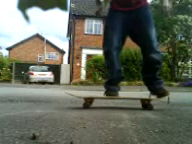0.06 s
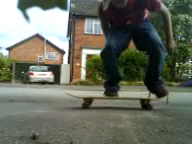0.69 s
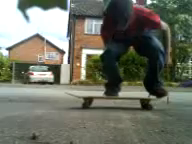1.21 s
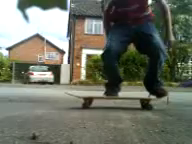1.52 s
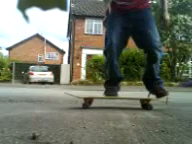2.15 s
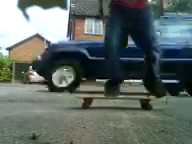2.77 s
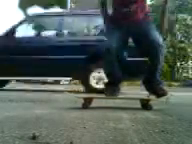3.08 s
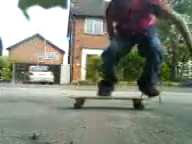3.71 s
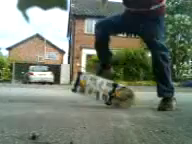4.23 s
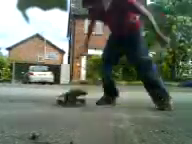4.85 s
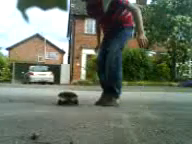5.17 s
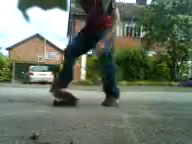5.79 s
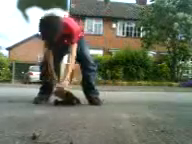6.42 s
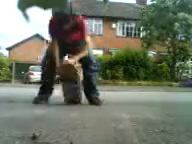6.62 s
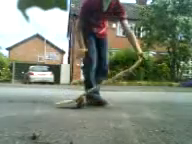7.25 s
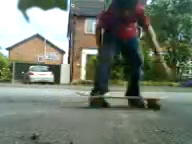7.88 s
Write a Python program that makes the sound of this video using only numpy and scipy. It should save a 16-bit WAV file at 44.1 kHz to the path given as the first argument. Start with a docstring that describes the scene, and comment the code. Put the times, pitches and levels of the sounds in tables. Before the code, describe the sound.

A wooden skateboard cracks, skids and bounces on the pavement among scuffing shoes, after a diesel car rumbles slowly by.

```python
"""Missed flip trick on a residential street

Close by, a wooden skateboard pops, slams on the asphalt, skids and clatters among scuffing shoes; it is
kicked over, picked up with its wheels spinning and dropped on them. House fronts return a thin echo.
Behind it a diesel car crawls past, about five metres off at its nearest. Heard from a small camera on
the ground, through a narrow-band microphone that overloads on the hardest slam."""
import sys
import numpy as np
from scipy import signal
from scipy.fft import rfft, irfft, next_fast_len
from scipy.io import wavfile
from scipy.ndimage import uniform_filter1d

SR = 44100
rng = np.random.default_rng(int(sys.argv[2]) if len(sys.argv) > 2 else 0)


def waveform_to_disk(signal):
    """Save audio, clipped to [-1, 1], as 16-bit WAV at the path in sys.argv[1]."""
    frames = np.transpose(np.atleast_2d(signal))
    scaled = np.clip(frames, -1, 1) * 32767
    samples = np.round(scaled).astype(np.int16)
    wavfile.write(sys.argv[1], SR, samples)


N = 354123
TIME = np.arange(N) / SR

# blows on the board: t/s, level/dB, brightness/dB, flat slap/dB, hollow knock/dB, contact/s
BLOWS = [(4.034, -16.5, -1, 1, -13.5, .0013), (4.3473, -19, -3.5, 3.5, 3.5, .0075),
         (4.3773, -14, 1, 2.5, 0, .004), (4.38, -8, 9.5, 2, -9.5, .0063),
         (4.4929, -31, 3.5, -2, -.5, .0015), (4.566, -21.5, 4, -2, -1.5, .0038),
         (4.595, -30.5, 0.5, -3, -2.5, .002), (4.6589, -31, 2, -4, 2.5, .004),
         (4.679, -32.5, 0, 0, -1.5, .002), (4.7449, -35.5, -1, -3.5, -0.5, .002),
         (4.786, -22.5, 1.5, -.5, -6, .005), (4.823, -25, -2.5, 7.5, 3.5, .009),
         (4.981, -36, -0.5, 4, 8, .008), (5.0024, -25, 3, -8, 3.5, .006),
         (5.0184, -14, -1.5, -1, -2, 0.0035), (5.102, -36.5, 0.5, 1, 5, .006),
         (5.135, -37.5, -1.5, 1, -1, .005), (5.722, -31, -5.5, 0.5, 0, 0.005),
         (5.8324, -20, 6, -3, -3.5, .0024), (5.8385, -14.5, -3, -0.5, -1.5, 0.0069),
         (5.906, -31.5, -3.5, 1, 8, 0.0045), (5.979, -20, -4, -1, -1, 0.0045),
         (6.055, -31.5, -3, -1, 5.5, .009), (6.6592, -20, 5, .5, -7, 0.0025),
         (6.761, -31, 0, -2.5, 0, 0.006), (7.328, -19.5, -2, 4.5, 0, 0.0084),
         (7.4064, -42.5, 4, 5, 6, .003), (7.431, -39.5, 2, 4, -5, .005),
         (7.9152, -23.5, 2.5, 3, -2.5, .0045)]
# modes of deck and trucks: f/Hz, level/dB, t60/s before a blow or skid shortens it
BOARD_MODES = [(135, -15.5, 0.025), (290, -9.5, 0.074), (502, -6, 0.076), (567, 0, 0.071),
               (696.5, -3.5, 0.049), (798, 0, 0.062), (938, -2.5, 0.053), (1062.6, -0.5, 0.031),
               (1259, -1, 0.032), (1455, 0.5, 0.065), (1600, -9, 0.051), (1726, -5.5, 0.071),
               (1815, -3.5, 0.069), (2009, -8, 0.042), (2270, -5.5, 0.1), (2635, -6, 0.034),
               (2695, 1, 0.049), (2983, -3, 0.088), (3166, -5.5, 0.053)]
# registers of a blow (thump, body, knock, clack, crack): low f/Hz, high f/Hz, grit re wood/dB
REGISTERS = [(69.5, 360, 6), (480, 780, -2.5), (750, 1250, 0.5), (1330, 2150, -2.5), (2036.5, 3500, 0.5)]
# board sliding on asphalt: t/s, length/s, level/dB, change over the slide/dB, edge scrape re skid/dB
SKIDS = [(4.047, 0.11, -31, -17.5, -14), (4.354, .03, -24.5, -1, -7.5), (4.399, 0.097, -37, 15, -18.5),
         (4.493, 0.26, -27.5, -9.5, -13.5), (4.837, 0.14, -35, -14, -17), (5.027, 0.073, -23.5, -19, -21.5),
         (5.145, 0.15, -37, -10, -14.5), (5.315, 0.052, -44.5, 5.5, -13.5), (5.62, 0.11, -48.5, 8, -12.5),
         (5.74, .095, -26, -8, -23.5), (5.861, .26, -27.5, -8, -24.5), (6.68, 0.12, -42.5, -3.5, -14.5),
         (7.337, 0.12, -42.5, -6.5, -3.5), (7.929, 0.084, -32.5, -11.5, -12.5)]
# shoes on grit and grip tape: t/s, half-width/s, thud/dB, rasp/dB
SCUFFS = [(2.968, 0.0068, -32.5, -55), (3.845, 0.0069, -36.5, -43), (5.169, 0.01, -36, -38),
          (5.309, 0.0091, -29.5, -43), (5.325, 0.028, -41, -40.5), (5.447, 0.0094, -56, -61),
          (5.631, 0.0062, -41.5, -51), (6.288, .058, -47, -48.5), (6.323, 0.015, -38, -51),
          (6.651, 0.0077, -43.5, -51), (7.522, 0.0071, -47, -57.5)]

# spectral shapes near the microphone: f/Hz, relative level/dB
SLIDING_WOOD = [(40, -26), (130, -14.5), (330, -11.5), (500, -3), (800, -2.5), (1100, 5), (1800, 1.5),
                (2300, -4), (3200, -19.5), (4200, -27)]
EDGE_SCRAPE = [(1200, -24), (2100, -2), (2700, 0.5), (3300, -6), (4200, -10.5)]
BEARING_WHIRR = [(100, -25), (330, -17), (510, 4.5), (800, -2.5), (1080, -7), (1380, -6.5), (1750, -12),
                 (2200, -19.5), (3200, -23.5)]
SOLE_THUD = [(60, -21.5), (300, -24), (500, 0), (750, -4.5), (1500, -20.5), (3000, -29.5)]
SOLE_RASP = [(600, -27), (1500, -8), (2300, -2), (2850, 1), (3300, -8.5), (4200, -19.5)]
# spectral shapes of the car, out on the road: f/Hz, relative level/dB
ROAD_RUSH = [(30, -36), (90, -19), (200, -17.5), (330, -16.5), (470, 3), (850, 4), (1150, -6.5),
             (1700, -9.5), (2300, -28), (3200, -23), (4200, -33)]
DIESEL_KNOCK = [(200, -25), (500, -12), (800, -5.5), (1150, 4.5), (1500, 2), (1900, -1), (2300, -14.5),
                (3100, -15.5), (4200, -23)]
BLOCK_RING = [(1300, -29), (1650, -7.5), (1820, 2.5), (1950, -5.5), (2150, -15.5), (3000, -37)]
TREAD_CRACKLE = [(1200, -14), (1900, -3.5), (2500, 4.5), (3100, 5), (4200, -16)]


def clatter(ring_scale=.75, halving_db=11.5):
    """Pop, slam and bounces. Hard contact trades body for crack and dies sooner; a flat slap thumps."""
    out = np.zeros(N)
    grit_noise = [band(rng.standard_normal(SR), lo, hi) for lo, hi, _ in REGISTERS]
    for start_s, db, bright_db, slap_db, knock_db, contact_s in BLOWS:
        thump, body = slap_db - 19, slap_db - bright_db - 3
        clack, crack = -slap_db - 1, slap_db + bright_db - 10
        levels_db = db + np.array([thump, body, knock_db, clack, crack])
        decay_scale = ring_scale * 2 ** (-max(bright_db, 0) / halving_db)
        add(out, start_s, blow(levels_db, contact_s, decay_scale, grit_noise))
    return out


def blow(levels_db, contact_s, decay_scale, grit_noise, rise_share=0.22, window_s=0.015):
    """Wood rings and grit crunches while the edge bears on the asphalt, then both die away."""
    t = np.arange(SR // 8) / SR
    rise = 1 - np.exp(-t / (rise_share * contact_s))
    crunch = fade(np.maximum(t - contact_s, 0), 0.1 * decay_scale)
    start = rng.integers(SR // 2)
    out = 0
    for (lo, hi, grit_db), grit, db in zip(REGISTERS, grit_noise, levels_db):
        modes = [mode for mode in BOARD_MODES if lo <= mode[0] < hi]
        wood = board_ring(t, modes, decay_scale, contact_s) * rise
        part = unit(wood) + amp(grit_db) * unit(grit[start:start + len(t)] * crunch * rise)
        # the level sets the energy, however long the ring
        out = out + amp(db) * part / np.sqrt(np.sum(part ** 2) / (window_s * SR))
    return out


def board_ring(t, modes, decay_scale, held_s=0, scatter_db=4.0, detune=0.016):
    """The board's modes, driven for held_s, then free; where it is struck sets their shares and signs."""
    free_s = np.maximum(t - held_s, 0)
    out = 0
    for hz, db, t60 in modes:
        side, share, shift = rng.standard_normal(3)
        tone = np.sin(2 * np.pi * hz * (1 + detune * shift) * t)
        out = out + np.sign(side) * amp(db + scatter_db * share) * tone * fade(free_s, t60 * decay_scale)
    return out


def skid(grains_per_s=1300, judder_db=1.0, attack_s=0.0091, release_t60_s=0.041):
    """Asphalt grains catch on the sliding board and ring it; a bare edge adds a bright scrape."""
    slide, edge = np.zeros(N), np.zeros(N)
    for start_s, length_s, db, change_db, edge_db in SKIDS:
        release = fade(np.maximum(TIME - start_s - length_s, 0), release_t60_s)
        force = ramp(start_s, attack_s) * amp(db + change_db * ramp(start_s, length_s)) * release
        slide, edge = np.maximum(slide, force), np.maximum(edge, amp(edge_db) * force)
    catches = grains(grains_per_s, spread_db=4) * amp(judder_db * walk(110))
    t = np.arange(SR // 8) / SR
    ring = board_ring(t, BOARD_MODES, decay_scale=0.32, scatter_db=-3.5, detune=0.0034)
    rung = signal.oaconvolve(catches, ring)[:N]
    wood = steady(colour(unit(rung) + unit(catches), SLIDING_WOOD))
    return slide * wood + edge * steady(colour(catches, EDGE_SCRAPE))


def flight(start_s=4.04, end_s=4.34, hz=550, db=-39, t60=1.1):
    """With nothing to damp it, the deck hums while it flips through the air."""
    t = np.arange(int((end_s - start_s) * SR)) / SR
    hum = amp(db) * np.sin(2 * np.pi * hz * t) * fade(t, t60)
    out = np.zeros(N)
    add(out, start_s, hum * signal.windows.tukey(len(t), .1))
    return out


def wheels(start_s=6.67, length_s=0.77, edge_s=0.0091, db=-47, slowing_db_per_s=5):
    """While the board is carried its wheels spin freely and the bearings' whirr runs down."""
    spinning = ramp(start_s, edge_s) - ramp(start_s + length_s, edge_s)
    return spinning * amp(db - slowing_db_per_s * (TIME - start_s)) * noise(BEARING_WHIRR)


def shoes():
    """Steps near the microphone, each a soft thud of the sole with a rasp of grit."""
    thud = steady(noise(SOLE_THUD))
    rasp = steady(colour(grains(1000, spread_db=2.5), SOLE_RASP))
    out = np.zeros(N)
    for at_s, width_s, thud_db, rasp_db in SCUFFS:
        near = slice(int((at_s - .2) * SR), int((at_s + .2) * SR))
        pressure = np.exp(-((TIME[near] - at_s) / width_s) ** 2)
        out[near] += pressure * (amp(thud_db) * thud[near] + amp(rasp_db) * rasp[near])
    return out


def car(drive_hz=25.44, idle_hz=22.5, sag_hz_per_s=1.2, ease_s=0.92, load_db=7.5):
    """Diesel firings knock and ring the engine block; tyres and fan rush underneath."""
    # the driver eases off: the block rings less and the engine slows toward idle
    load = 1 - ramp(ease_s, 0.18)
    firing_hz = np.maximum(drive_hz - sag_hz_per_s * np.maximum(TIME - ease_s, 0), idle_hz)
    firings = np.cumsum(firing_hz) / SR + 0.028 * walk(27)  # slightly uneven timing
    pulse = knocks(firings, scatter_db=1.5, lope_db=-0.5, floor=0.58)
    block_pulse = knocks(firings, scatter_db=3.0, lope_db=1.0, floor=0.027)
    ring = block_pulse * steady(noise(BLOCK_RING), window_s=0.012)
    throb, flicker = unit(1 + .15 * pulse), 1.44
    rush = noise(ROAD_RUSH) * throb * amp(flicker * walk(15))
    road = drive_by(-37.5, -38, -41) * rush
    diesel = drive_by(-36.5, -50.5, -44.5) * pulse * noise(DIESEL_KNOCK)
    block = drive_by(-46.5, -50, -62) * amp(load_db * load) * ring
    pull_away = amp(4.5 * ramp(6.4, 0.86))  # louder as it pulls away down the street
    return (road + diesel + block) * pull_away


def knocks(firings, scatter_db, lope_db, floor, rise=.08, decay=.28):
    """A swell at each firing; every other cylinder is stronger and no two firings are alike."""
    phase, count = firings % 1, firings.astype(int)
    strength = amp(scatter_db * rng.standard_normal(512) + lope_db * (-1) ** np.arange(512))[count]
    return unit(floor + strength * (1 - np.exp(-phase / rise)) * np.exp(-phase / decay))


def drive_by(ahead_db, beside_db, behind_db, passes_s=3.18, speed_m_s=5.86, nearest_m=5.43):
    """Gain at the microphone: it falls with distance and changes as the car shows front, side and rear."""
    along_m = speed_m_s * (TIME - passes_s)
    distance_m = np.hypot(along_m, nearest_m)
    facing_db = np.interp(along_m / distance_m, [-1, 0, 1], [ahead_db, beside_db, behind_db])
    return amp(facing_db) * nearest_m / distance_m


def tyres(loudest_s=2.65, passing_s=0.57, db=-54):
    """The tread crackles over loose grit, heard only while the car is close."""
    crackle = unit(colour(grains(5000, spread_db=2.8), TREAD_CRACKLE))
    return amp(db) / (1 + ((TIME - loudest_s) / passing_s) ** 2) * crackle


def street(x, build_s=0.013, t60=0.49, db=-25):
    """House fronts and hedges return a thin, scattered echo."""
    t = np.arange(SR) / SR
    scatter = band(rng.standard_normal(len(t)), 300, 3900, order=1)
    echo = scatter * fade(t, t60) * np.clip(t / build_s, 0, 1) ** 2
    return x + amp(db) * signal.fftconvolve(x, echo / np.sqrt(np.sum(echo ** 2)))[:N]


def gain_control(x, threshold_db=-16, attack_s=0.005, release_s=0.15, squeeze=0.26, hop=64):
    """The camera turns itself down for a moment after a loud blow."""
    blocks = np.abs(x[:N // hop * hop]).reshape(-1, hop).mean(axis=1)
    level, levels = 0, []
    for block in blocks.tolist():
        level += (block - level) * hop / SR / (attack_s if block > level else release_s)
        levels.append(level)
    envelope = np.interp(np.arange(N) / hop, np.arange(len(levels)) + 1, levels)
    return x * np.maximum(envelope / amp(threshold_db), 1) ** -squeeze


def amp(db):
    """Decibels to gain."""
    return 10 ** (np.asarray(db) / 20)


def unit(x):
    """Scale to rms 1."""
    return x / np.sqrt(np.mean(x ** 2) + 1e-18)


def steady(x, window_s=0.04):
    """Scale to a running rms of 1, so that only the fine grain is left."""
    return x / np.sqrt(np.abs(uniform_filter1d(x ** 2, int(window_s * SR))) + 1e-12)


def fade(t, t60):
    """Exponential decay that loses 60 dB in t60."""
    return np.exp(-np.log(1000) * t / max(t60, 1e-3))


def ramp(start_s, length_s):
    """Rises from 0 to 1 over length_s."""
    return np.clip((TIME - start_s) / max(length_s, 1e-3), 0, 1)


def colour(x, spectrum):
    """Filter by a spectrum of f/Hz, level/dB."""
    hz, db = np.transpose(spectrum)
    size = next_fast_len(len(x) + SR // 10)
    f = np.fft.rfftfreq(size, 1 / SR) + 1
    return irfft(rfft(x, size) * amp(np.interp(np.log(f), np.log(hz), db)), size)[:len(x)]


def band(x, lo_hz, hi_hz, order=3):
    """Causal band-pass."""
    return signal.sosfilt(signal.butter(order, [lo_hz, hi_hz], "band", fs=SR, output="sos"), x)


def noise(spectrum):
    """Coloured noise of rms 1."""
    return unit(colour(rng.standard_normal(N), spectrum))


def walk(rate_hz):
    """Smooth random wander."""
    knots = rng.standard_normal(4096)
    return np.interp(TIME * rate_hz, np.arange(len(knots)), knots)


def grains(per_s, spread_db):
    """Random clicks of very unequal size."""
    hit = rng.random(N) < per_s / SR
    return hit * rng.choice([-1, 1], N) * amp(spread_db * np.minimum(rng.exponential(size=N), 4))


def add(out, start_s, x):
    """Mix x into out at start_s."""
    i = int(start_s * SR)
    out[i:i + len(x)] += x[:len(out) - i]


def scene():
    """From the ground, in mono: the skater close by, the car behind."""
    skater = clatter() + flight() + skid() + wheels() + shoes()
    return (street(skater) + car() + tyres())[None]


def record(dry, low_cut_hz=45, roll_off_hz=3190, stop_hz=4820, ceiling=0.67, top_hz=16100):
    """The microphone passes little above 4 kHz; its preamplifier clips the hardest blows."""
    size = next_fast_len(N + SR // 10)
    f = np.fft.rfftfreq(size, 1 / SR)
    slope = np.clip((f - roll_off_hz) / (stop_hz - roll_off_hz), 0, 1)
    response = (1 - slope) ** 2.1 * f / np.hypot(f, low_cut_hz)
    narrow = irfft(rfft(dry[0], size) * response, size)[:N]
    clipped = np.clip(gain_control(narrow), -ceiling, ceiling)
    return signal.sosfilt(signal.ellip(8, .2, 70, top_hz, fs=SR, output="sos"), clipped)[None]


dry = scene()
out = record(dry)
waveform_to_disk(out)
```